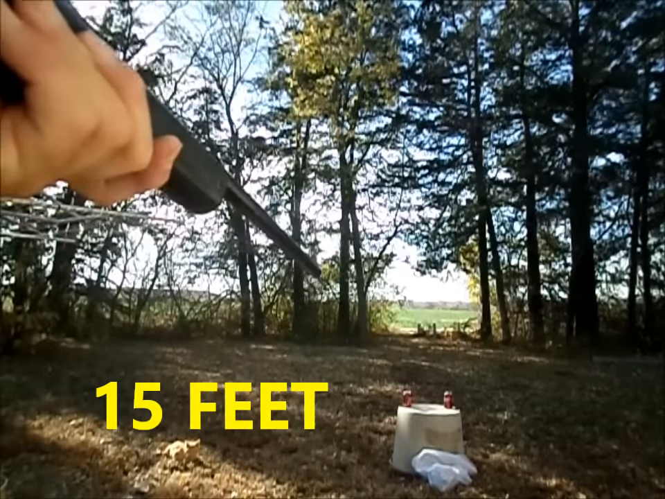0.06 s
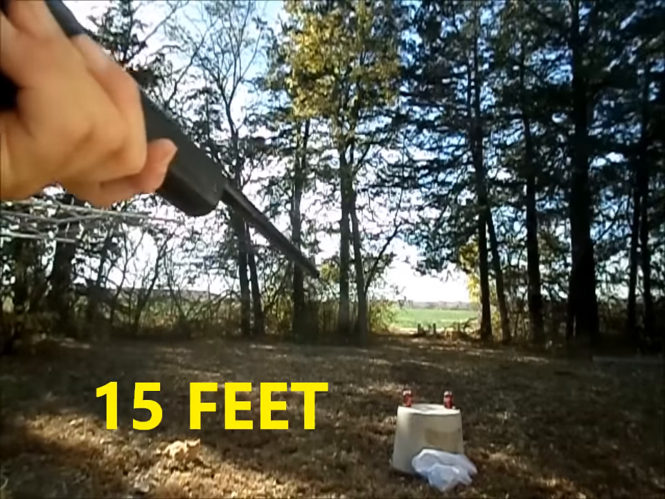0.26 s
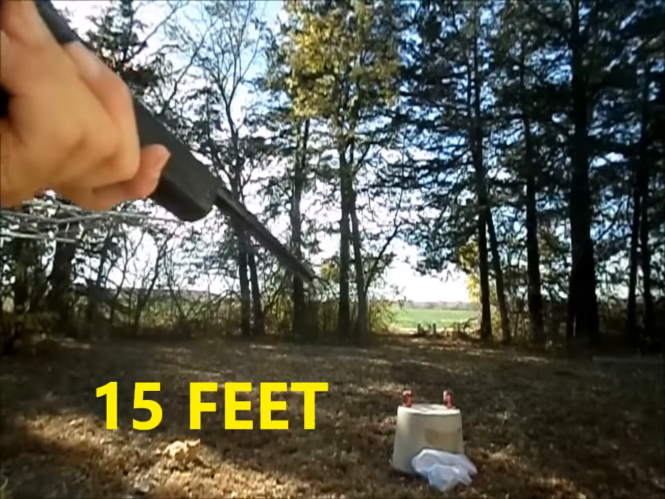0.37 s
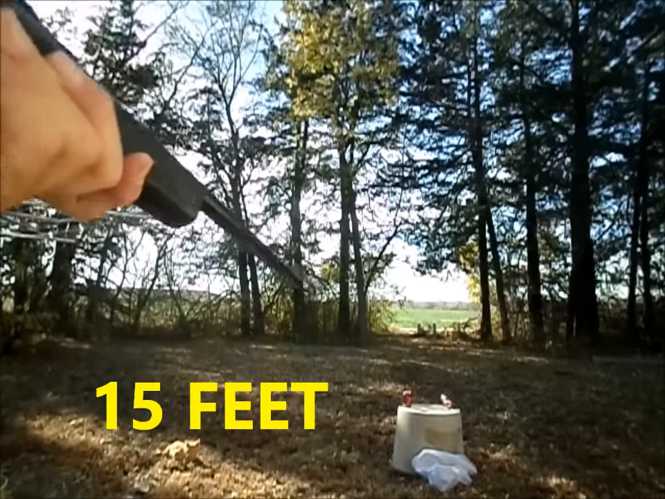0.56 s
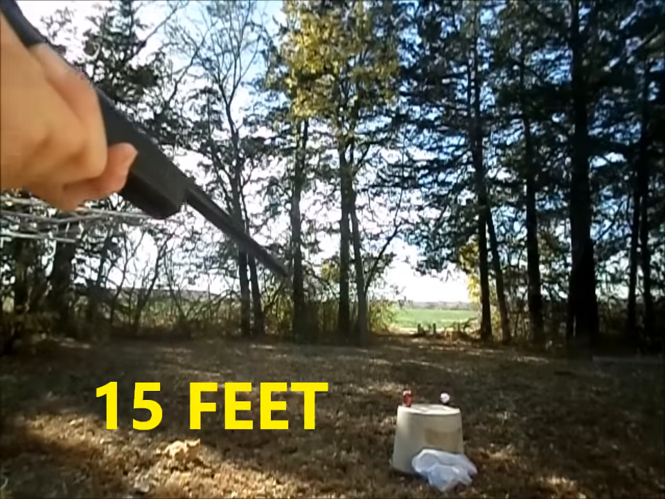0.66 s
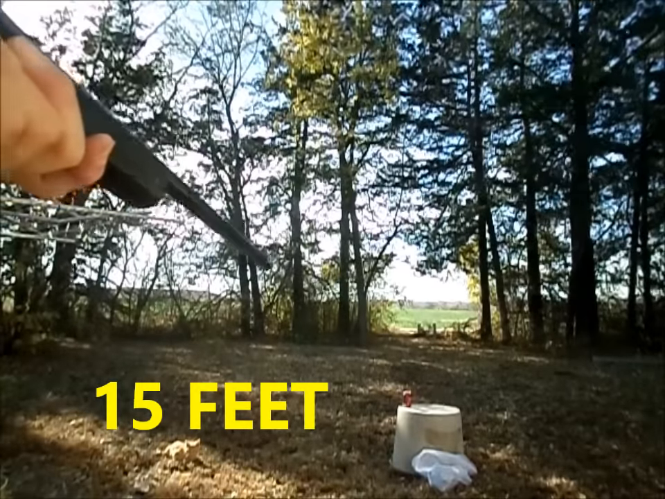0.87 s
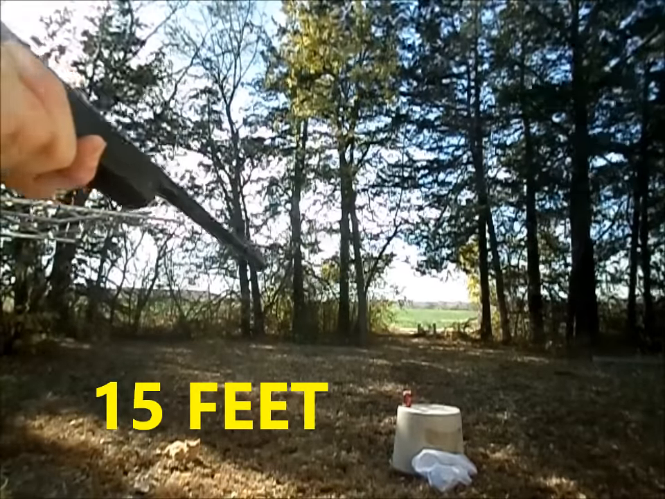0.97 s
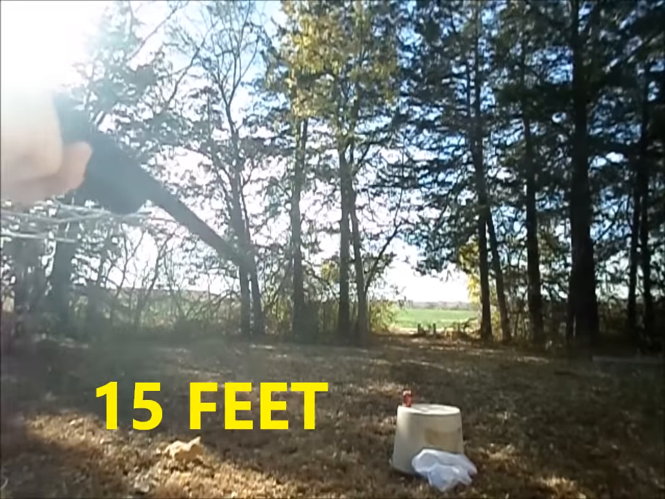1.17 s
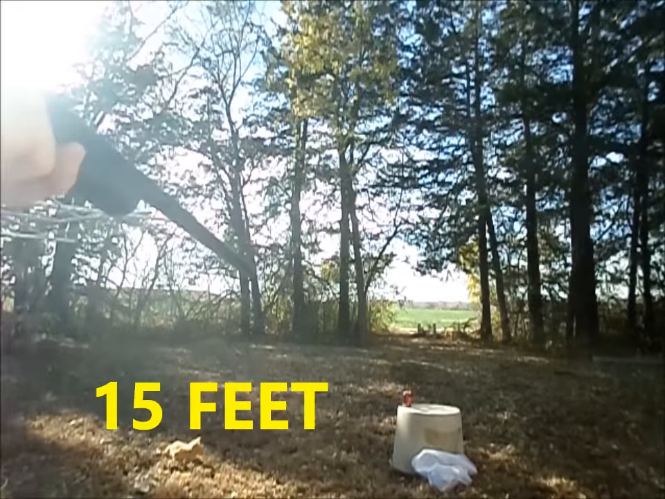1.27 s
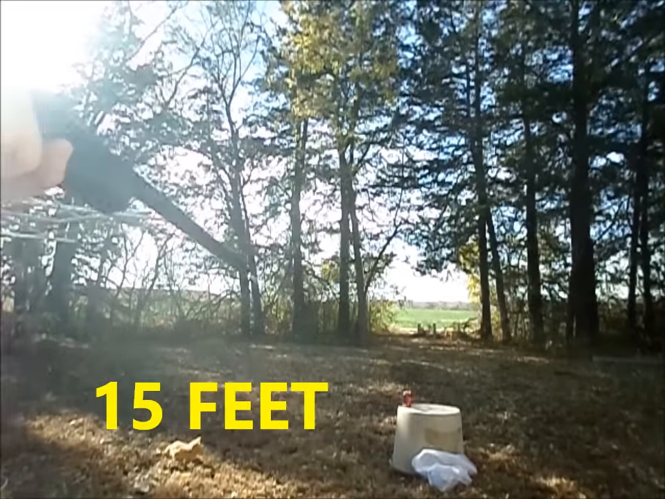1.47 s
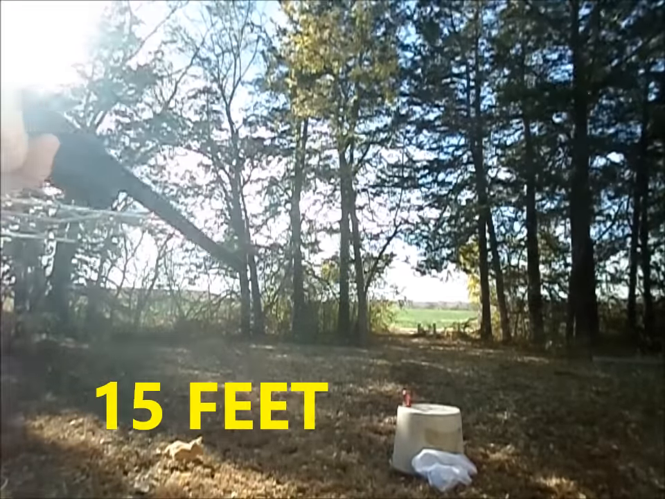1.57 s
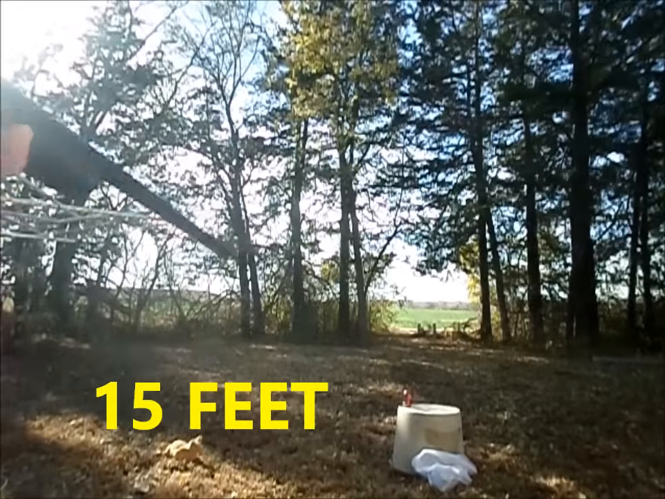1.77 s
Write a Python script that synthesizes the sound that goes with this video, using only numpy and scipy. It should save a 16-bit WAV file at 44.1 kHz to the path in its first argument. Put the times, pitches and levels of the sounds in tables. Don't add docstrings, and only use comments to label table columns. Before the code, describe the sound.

A spring air rifle fires twice up close outdoors, each pellet cracking into a metal can

```python
import sys
import numpy as np
from scipy import signal
from scipy.fft import rfft, irfft
from scipy.io import wavfile
from scipy.ndimage import uniform_filter1d

SR = 44100
rng = np.random.default_rng(int(sys.argv[2]) if len(sys.argv) > 2 else 0)


def dump(signal):
    limited = np.clip(np.atleast_2d(signal).T, -1, 1)
    pcm = np.round(limited * 32767).astype(np.int16)
    wavfile.write(sys.argv[1], SR, pcm)


def natural_amplitude(level_db):
    exponent = np.asarray(level_db, float) / 20
    return 10 ** exponent


N = 79380
T = np.arange(N) / SR

# frequency in Hz, level in dB per Hz.
THIN_STEEL = [(180, -50.5), (300, -21.5), (4590, -9), (6620, -5.5), (7320, -5.5), (12100, -9), (15000, -6),
              (16000, -9)]
# frequency in Hz, level in dB per Hz.
CAN_METAL = [(150, -43), (550, -6), (1000, -8.5), (1450, -23), (1750, -5), (3400, -6.5), (7000, -4.5),
             (16500, -3)]


def read(points, hz):
    f, value = np.transpose(points)
    return np.interp(np.log(hz + 1), np.log(f + 1), value)


def evened(x):
    return x / np.sqrt(np.mean(x ** 2) + 1e-20)


def noise(points):
    white = rfft(rng.standard_normal(N))
    return evened(irfft(white * natural_amplitude(read(points, np.fft.rfftfreq(N, 1 / SR))), N))


def dying(start, t60, rise=0.0001):
    t = np.maximum(T - start, 0)
    return (1 - np.exp(-t / rise)) * natural_amplitude(-60 * t / t60)


def ring(modes, start):
    out = np.zeros(N)
    for hz, db, t60 in modes:
        cycles = hz * rng.uniform(1.0, 1.01) * (T - start) + 0.18 * rng.random()
        out += natural_amplitude(db) * dying(start, t60) * np.sin(2 * np.pi * cycles)
    return out


def resonate(x, hz, width_hz):
    return signal.lfilter(*signal.iirpeak(hz, hz / width_hz, SR), x)


def resonant_noise(hz, width_hz):
    return evened(resonate(rng.standard_normal(N), hz, width_hz))


def air():
    # frequency in Hz, level in dB per Hz.
    air_tone = [(25, -13.5), (55, -9), (114, -20), (285, -11), (400, -16.5), (700, -16), (3000, -27.5),
                (16000, -36.5)]
    # shot in seconds, gain just after it in dB.
    gain_drops = [
        (0.211, -24.5),
        (1.46, -13.5),
    ]
    recover_db_per_s = 8.5
    smooth = 1500
    gust = evened(uniform_filter1d(rng.standard_normal(N), size=smooth))
    bed = natural_amplitude(-44 + 0.98 * gust) * noise(air_tone)

    wind_hz, wind_width_hz, steadiness = 39.8, 16, 0.7
    rumble = signal.hilbert(resonate(resonant_noise(wind_hz, wind_width_hz), wind_hz, wind_width_hz))
    bed += natural_amplitude(-45.5) * evened(rumble.real / abs(rumble) ** steadiness)

    drone_hz, drone_width_hz = 283.3, 46
    drone = resonate(resonant_noise(drone_hz, drone_width_hz), drone_hz, drone_width_hz)
    bed += natural_amplitude(-57.5) * evened(drone)

    gain_db = np.zeros(N)
    for shot, drop_db in gain_drops:
        gain_db = np.where(T > shot, drop_db + recover_db_per_s * (T - shot), gain_db)
    return bed * natural_amplitude(uniform_filter1d(gain_db, size=smooth))


def woods(x):
    # frequency in Hz, time to fall 60 dB in seconds.
    echo_times = [(200, 0.0606), (500, 0.26), (1000, 0.49), (3000, 0.41), (8000, .3), (16000, 0.3)]
    echoes = rng.choice([-1., 1.], SR) * (rng.random(SR) < 0.3)
    echoes[:301] = 0
    hz, t, bands = signal.stft(echoes, SR, nperseg=256)
    fade = natural_amplitude(-60 * t / read(echo_times, hz)[:, None])
    tail = signal.istft(bands * fade, SR, nperseg=256)[1]
    return signal.fftconvolve(x, tail / np.linalg.norm(tail))[:N]


def rustle():
    # middle of the puff in seconds, level in dB, length in seconds.
    puffs = [(0.188, -43.5, 0.027), (0.538, -69, .01), (0.602, -69, 0.016), (0.744, -68, 0.0095),
             (0.978, -63, 0.019), (1.014, -68.5, .02), (1.187, -69.5, 0.019), (1.254, -62.5, .015),
             (1.347, -69, 0.044)]
    # frequency in Hz, level in dB per Hz.
    leaf_tone = [(1500, -22.5), (3000, 2.5), (8000, -1), (16000, -1.5)]
    swell = sum(natural_amplitude(db) * np.exp(-((T - s) / length) ** 2) for s, db, length in puffs)
    return noise(leaf_tone) * swell


def trigger():
    # start in seconds, level in dB, fall time (60 dB) in seconds, latch ring in dB, hand noise in dB.
    clicks = [(0.389, -35.5, .008, -31, -41), (.4104, -19, 0.015, -10, -26.5),
              (.4124, -23, 0.012, -6.5, -40), (.418, -38.5, 0.033, -27, -38.5), (1.242, -50, .02, -27, -15),
              (1.702, -11.5, .012, -5.5, -19), (1.704, -16, .016, -11, -60),
              (1.7958, -31, 0.0081, -27, -28.5)]
    # frequency in Hz, level in dB per Hz.
    click_tone = [(600, -46.5), (1200, -8.5), (3000, -13), (6200, 0), (8300, -9.5), (10200, 0.5),
                  (12000, -4.5), (16000, -1)]
    # frequency in Hz, level in dB per Hz.
    hand_tone = [(800, -20), (2000, -4), (6000, 0), (10000, -1), (15700, -9), (15900, -60)]
    # pitch in Hz, level in dB, fall time (60 dB) in seconds.
    latch = [(1780, -12, .035), (2550, -11, .022), (3600, -12, .02), (4400, -11, .02), (5900, -6, .012),
             (6500, -4, .014), (10100, -2, .014), (14500, -5, .01)]
    out = np.zeros(N)
    for s, db, t60, latch_db, hand_db in clicks:
        tick = 0.92 * noise(click_tone) * dying(s, t60)
        hand = natural_amplitude(hand_db) * noise(hand_tone) * dying(s, 0.098)
        out += natural_amplitude(db) * (tick + hand + natural_amplitude(latch_db) * ring(latch, s))
    return signal.sosfilt(signal.butter(3, 888, "high", fs=SR, output="sos"), out)


def can_rocks():
    # start in seconds, level in dB, ring in Hz, fall time (60 dB) in seconds.
    rocks = [(.313, -26.5, 2445, 0.026), (0.32, -37.5, 560, 0.027), (1.545, -20.5, 2270, 0.044),
             (1.575, -48, 3530, 0.06)]
    out = np.zeros(N)
    for s, db, hz, t60 in rocks:
        knock = resonant_noise(hz, 450) + natural_amplitude(-8) * noise(CAN_METAL)
        out += natural_amplitude(db) * dying(s, t60, 0.0015) * knock
    return out


def can_hits():
    # start in seconds, crack in dB, ring in dB, crack fall time (60 dB) in seconds.
    hits = [(.2831, -7.5, -34.5, .04), (.2845, -17.5, -45, 0.016), (.288, -16, -34.5, 0.0476),
            (1.5119, -4.5, -20.5, 0.0946), (1.516, -14, -25.5, 0.037)]
    # pitch in Hz, level in dB, fall time (60 dB) in seconds.
    can_modes = [(1998, -13.5, 0.16), (2520, -16, 0.12), (3168, -9.5, 0.21), (3320, -1.5, 0.13),
                 (3650, 1.5, 0.073), (3900, -18, 0.19), (4494, -3, 0.048), (5800, -7.5, 0.17)]
    snap_db, snap_t60 = 8, 0.002
    shaken = [resonant_noise(hz, 150) for hz, _, _ in can_modes]
    out = np.zeros(N)
    for s, crack_db, ring_db, t60 in hits:
        snap = natural_amplitude(snap_db) * dying(s, snap_t60)
        out += natural_amplitude(crack_db) * noise(CAN_METAL) * (dying(s, t60) + snap)
        rough = sum(natural_amplitude(db) * dying(s, fall) * x for (_, db, fall), x in zip(can_modes, shaken))
        out += natural_amplitude(ring_db) * (0.13 * ring(can_modes, s) + rough)
    return out


def spring():
    # level in dB, fall time (60 dB) in seconds.
    notes_sung = [
        (-49, 1.5),
        (-49, 1.0),
    ]
    # start in seconds, damped by hand in seconds, low note in dB, high note in dB.
    songs = [
        (.235, .62, 0, 0),
        (1.465, 1.68, -12, 3),
    ]
    low_hz = 1022.5
    out = np.zeros(N)
    for s, end, *shot_levels in songs:
        damping = np.clip((end - T) / 0.024, 0, 1)
        for k, (db, t60) in enumerate(notes_sung):
            tone = np.sin(2 * np.pi * (k + 1) * low_hz * T)
            out += natural_amplitude(db + shot_levels[k]) * dying(s, t60, 0.02) * damping * tone
    return out


def steel_knocks():
    # start in seconds, level in dB, ring in Hz, fall time (60 dB) in seconds.
    knocks = [(0.2073, -4, 6860, 0.021), (0.2113, -8.5, 7340, 0.014), (0.2134, -1, 6400, .02),
              (.2183, -3.5, 6320, 0.012), (0.2252, -1, 4350, 0.0047), (0.2299, -4.5, 7640, 0.017),
              (0.2328, -2.5, 9000, 0.0059), (0.241, -10, 7700, 0.0066), (0.2501, -9.5, 8000, .008),
              (0.258, -17, 8800, 0.0017), (.2705, -16, 6440, .006), (1.4426, -12.5, 6410, 0.0116),
              (1.4455, -13.5, 7500, 0.021), (1.4539, -18.5, 5390, 0.036), (1.4589, -7, 5350, 0.017),
              (1.4608, -11.5, 7750, 0.0111), (1.479, -16.5, 8140, 0.0059), (1.4844, -9, 6800, 0.0034),
              (1.4985, -21, 7460, 0.0041)]
    clack, hiss = noise(THIN_STEEL), noise(THIN_STEEL)
    out = np.zeros(N)
    for s, db, hz, t60 in knocks:
        ringing = evened(resonate(hiss, hz, 380))
        out += natural_amplitude(db) * dying(s, t60) * (clack + natural_amplitude(-6) * ringing)
    return out


def air_rush():
    # start in seconds, piston stop in seconds, spring run in dB, air at the stop in dB.
    rushes = [
        (0.213, 0.222, -16, -11),
        (1.459, 1.456, -24, -10.5),
    ]
    # frequency in Hz, level in dB per Hz.
    rush_tone = [(180, -36), (300, -3.5), (656, -4), (1510, -6), (1660, -7), (3760, -7.5), (14500, -4.5),
                 (16000, -7)]
    rattles_per_s, rattle_db, t60 = 3000, 4, 0.19
    grit = evened(uniform_filter1d(rng.standard_normal(N), size=SR // rattles_per_s))
    out = np.zeros(N)
    for start, stop, run_db, stop_db in rushes:
        run = natural_amplitude(run_db) * noise(THIN_STEEL) * dying(start, t60) * (T < stop)
        escape = natural_amplitude(stop_db) * noise(rush_tone) * dying(stop, t60, 0.006)
        out += natural_amplitude(rattle_db * grit) * (run + escape)
    return out


def piston_thumps():
    # start in seconds, level in dB, push length in seconds, stock ring in dB.
    thumps = [
        (.2335, -8, 0.0011, -5.5),
        (0.2532, -5.5, 0.00058, -10.5),
        (1.4611, -7.5, .0012, -4),
        (1.4827, -5.5, 0.00064, -11),
    ]
    # pitch in Hz, level in dB, fall time (60 dB) in seconds.
    stock = [(211, -1, 0.042), (686, 2, 0.018), (1060, 1, 0.023), (302, -14.5, .05)]
    out = np.zeros(N)
    for s, db, length, stock_db in thumps:
        u = np.maximum(T - s, 0) / length
        push = -u * (2 - u) * np.exp(-u)
        out += natural_amplitude(db) * (push + natural_amplitude(stock_db) * ring(stock, s))
    return out


def scene():
    shots = steel_knocks() + air_rush() + piston_thumps() + can_hits() + can_rocks()
    mix = air() + natural_amplitude(-18) * woods(shots) + rustle() + spring() + shots
    top_edge = signal.firwin(511, 15850, window=("kaiser", 5), fs=SR)
    mix = signal.oaconvolve(mix, top_edge, "same")
    return (mix + trigger())[None]


def band_limit(x):
    return signal.sosfilt(signal.butter(12, 16650, fs=SR, output="sos"), x)


def record(dry):
    # attack in seconds, dip in dB, dip length in seconds, noise swell in dB.
    dips = [(0.2057, -1, 0.0012, -23.5), (0.2813, -18, 0.0071, -23.5), (.4105, -2, 0.00478, -66),
            (1.4401, -25.5, 0.0025, -22), (1.511, -9.5, 0.0056, -25.5), (1.703, -19.5, 0.011, -38)]
    lead_s, edge_s, fade_db_per_s = 0.0035, 0.0015, 3000
    dip_db, lead = np.zeros(N), np.zeros(N)
    for s, db, length, lead_db in dips:
        before = T < s - lead_s / 2
        dip_db += db * np.clip((T - s + lead_s + length) / edge_s, 0, 1) * before
        rise = np.clip(1 + (T - s) / lead_s, 0, 1)
        lead += natural_amplitude(lead_db) * rise * natural_amplitude(-fade_db_per_s * np.maximum(T - s, 0))
    lead_noise = lead * noise(THIN_STEEL + [(16200, -57)])
    bass = signal.sosfiltfilt(signal.butter(2, 580, fs=SR, output="sos"), dry)
    limited = bass * natural_amplitude(0.31 * dip_db) + (dry - bass) * natural_amplitude(dip_db)
    return band_limit(np.clip(limited + lead_noise, -1, 1))


dry = scene()
out = record(dry)
dump(out)
```